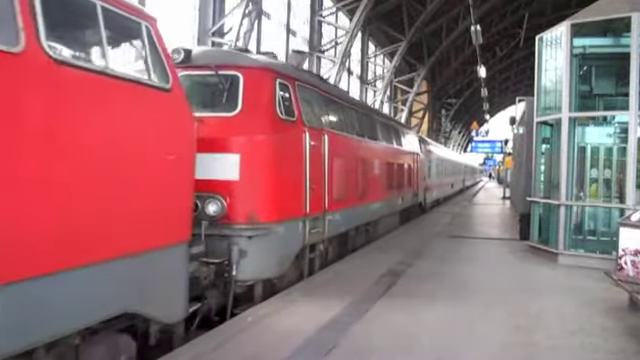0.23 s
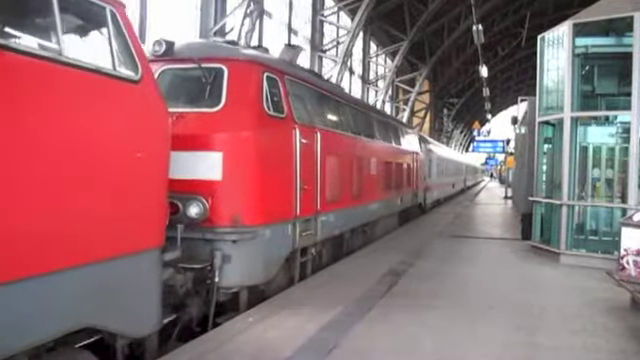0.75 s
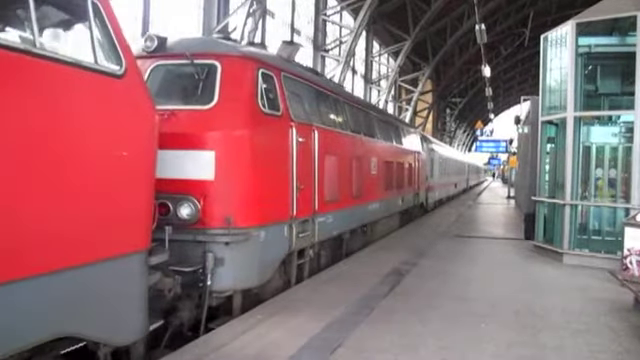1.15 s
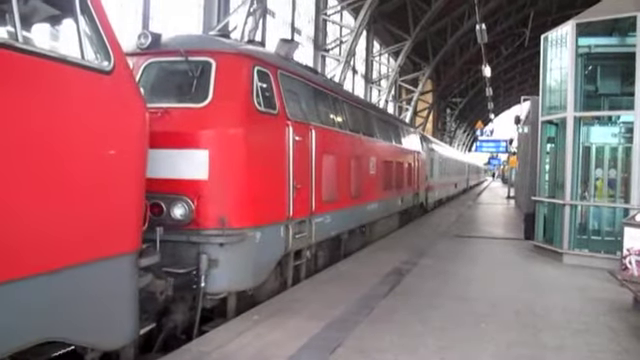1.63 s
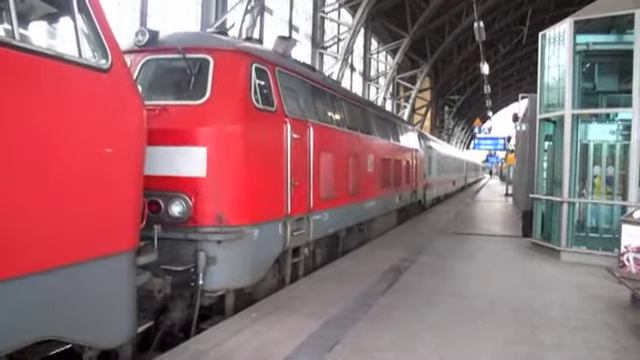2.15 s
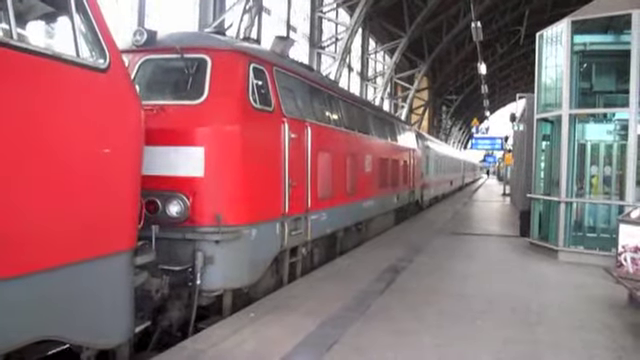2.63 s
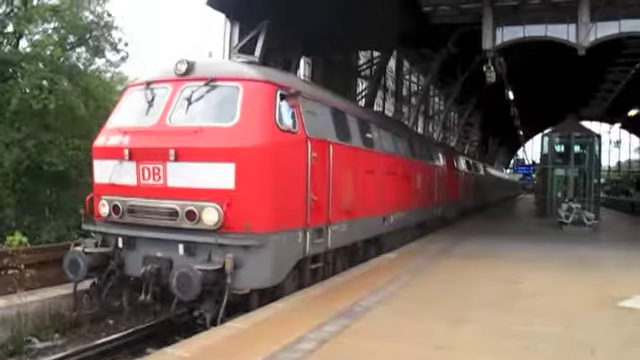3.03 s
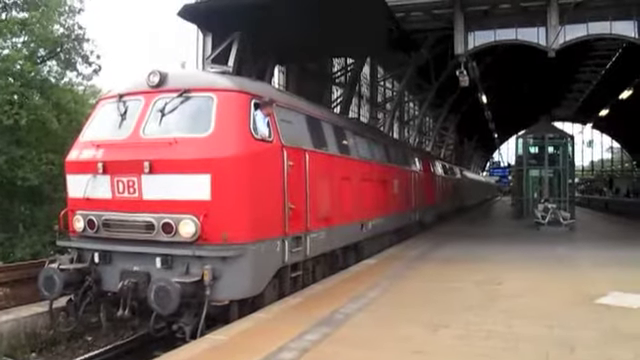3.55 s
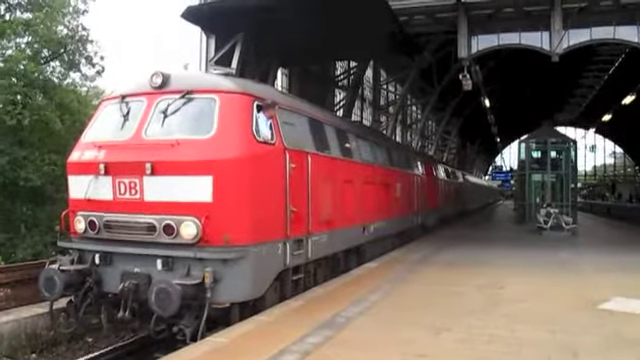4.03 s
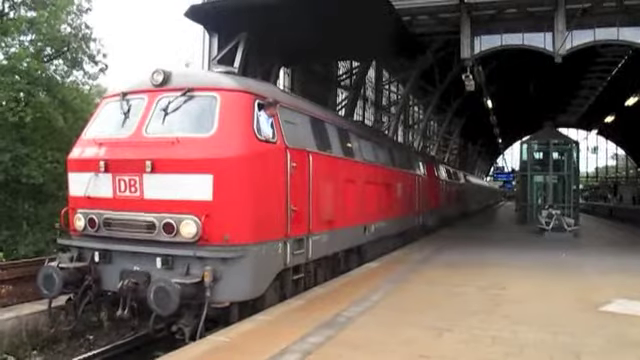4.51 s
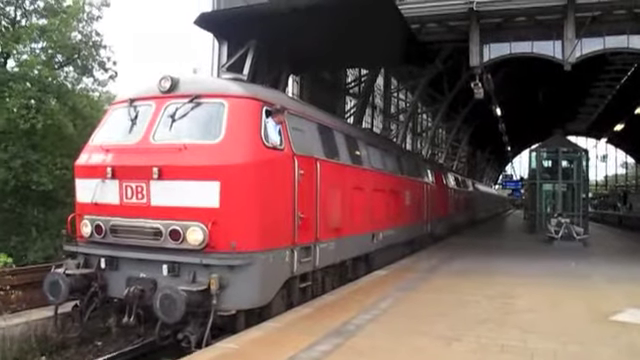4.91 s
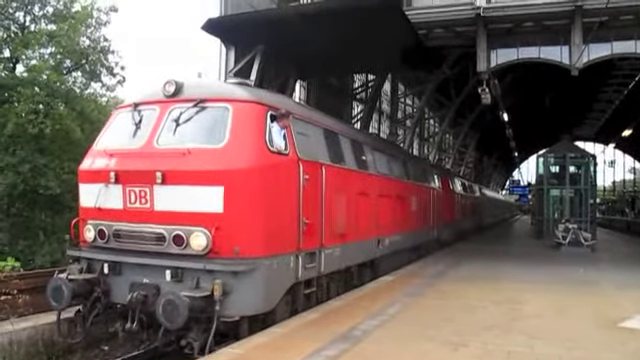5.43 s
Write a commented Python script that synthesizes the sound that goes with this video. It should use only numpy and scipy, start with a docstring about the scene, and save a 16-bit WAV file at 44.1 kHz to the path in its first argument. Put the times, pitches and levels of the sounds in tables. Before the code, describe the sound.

Under a station roof, a braking train gives a long, piercing wheel squeal, with shorter squeaks and the rub and hiss of brake blocks around it. The squeal dies away while diesel engines swell and begin to clatter. The sound cuts out for an instant, then resumes near the front locomotive, whose engines idle with a low hum, an even roar and sharp metallic ticking.

```python
"""Diesel locomotives braking and idling

In a station hall, stick-slip friction makes one wheel squeal on a high resonance; others join briefly
and brake blocks grind. Engine roar and clatter grow louder as the squeal fades. After a short silence
the front locomotive is heard from close by: two engines idle with a low periodic throb, a mid-range
roar and a clatter of valves and injectors, whose impacts excite the resonances of covers and pipes."""
import sys
import numpy as np
from scipy import signal
from scipy.fft import rfft, irfft, next_fast_len
from scipy.io import wavfile
from scipy.ndimage import uniform_filter1d

SR = 44100
rng = np.random.default_rng(int(sys.argv[2]) if len(sys.argv) > 2 else 0)


def waveform_to_disk(signal):
    """Save audio, clipped to [-1, 1], as 16-bit WAV at the path in sys.argv[1]."""
    frames = np.transpose(np.atleast_2d(signal))
    scaled = np.clip(frames, -1, 1) * 32767
    samples = np.round(scaled).astype(np.int16)
    wavfile.write(sys.argv[1], SR, samples)


N = 250047
T = np.arange(N) / SR
SILENCE_START_S, SILENCE_END_S = 2.753, 2.887

# The main wheel's ring holds, then dies as the train slows. Each row: time in seconds, level in dB.
RING_LEVEL = [(0, -21.5), (.45, -20), (.66, -19.5), (.8, -22.5), (1.47, -22), (1.62, -25), (1.75, -23.5),
              (2.05, -29), (2.2, -32.5), (2.3, -42), (2.75, -45.5)]
# The brake block lets go for an instant. Each row: time in seconds, depth of the dip in dB.
SLIPS = [(.17, 12), (.31, 11.5), (.37, 9), (.409, 9), (0.49, 15), (.79, 18), (.919, 11), (1.048, 14),
         (1.17, 2.5), (1.311, 12), (1.39, 24), (1.57, 7), (1.81, 14), (2.08, 17)]
# Combination tones. Each row: multiple of the ring, multiple of the lower mode, relative level in dB.
SIDEBANDS = [(0, 1, -2.5), (1, -1, -6.5), (1.001, 1, -4), (2.001, -1, -8.5), (2, 1, -6), (.5, 0, -11.5),
             (1.5, 0, -9.5)]
# The lower mode joins late and catches twice. Each row: time in seconds, sideband level in dB.
SIDEBAND_LEVEL = [(0, -46), (.65, -51), (1.05, -35), (1.2, -42), (1.35, -34), (1.67, -32), (1.8, -36.5)]
# Other wheels. Each row: start in seconds, length in seconds, pitch in Hz, glide in Hz/s, level in dB.
WHEEL_SQUEALS = [(0, .25, 2250, 160, -36), (0, 1.1, 10575, 0, -46), (.36, .1, 3220, -700, -40),
                 (.38, .08, 2990, 0, -41), (.47, .08, 1150, 600, -34), (.7, .16, 2480, -200, -36),
                 (.86, .19, 3240, -250, -43), (1.02, .13, 9370, 300, -41), (1.03, .19, 7730, -200, -40),
                 (1.14, .09, 5170, 400, -35), (1.24, .21, 6300, 0, -42), (1.15, .8, 4202, 0, -41)]
# Rubbing of the brake blocks. Each row: time in seconds, grinding level in dB, hiss level in dB.
BRAKE_LEVELS = [(0, -35, -32.5), (.22, -36, -39.5), (.35, -34.5, -34.5), (.62, -39, -40.5),
                (.75, -34.5, -32), (.92, -37.5, -35.5), (1.3, -37.5, -38), (1.6, -39, -38.5),
                (2.0, -38.5, -37), (2.25, -42, -35.5), (2.42, -37, -37), (2.75, -39.5, -36)]
# The clatter grows as the squeal fades, then wavers at idle. Each row: time in seconds, level in dB.
CLATTER_LEVEL = [(1.6, -58), (1.85, -37.5), (2.22, -28.5), (2.4, -33), (2.75, -34.5), (2.9, -32.5),
                 (3.4, -33.5), (3.55, -33), (3.95, -32), (4.45, -36.5), (4.95, -29), (5.12, -33),
                 (5.6, -31)]
# The loudest valve gear rattles. Each row: start in seconds, strength in dB.
LOUD_RATTLES = [(1.8322, -30), (1.9284, -31.5), (2.0184, -30), (2.1794, -33), (2.3944, -31.5),
                (2.6292, -33), (2.9277, -31), (3.012, -27.5), (3.1418, -29), (3.3159, -37), (3.5112, -31.5),
                (3.736, -31.5), (3.8956, -30.5), (4.0657, -33), (4.3386, -33.5), (4.899, -27), (4.991, -27),
                (5.187, -26.5), (5.2649, -27), (5.3368, -33), (5.3926, -31.5), (5.483, -30.5), (5.613, -29)]
# Resonances of covers and pipes. Each entry: frequency in Hz.
CASING_HZ = [6580, 7220, 7840, 7920, 8980]
# The near engine. Each row: time in seconds, firing rate in Hz, level in dB.
FIRING = [(2.89, 95.1, -38), (4.45, 86.2, -43.5), (5.6, 86.3, -44)]
# Engine orders. Each row: multiple of the firing rate, relative level in dB.
ENGINE_ORDERS = [(1, -1.5), (1.5, -27), (2, -7.5)]
# Resonances of the engine block. Each row: frequency in Hz, bandwidth in Hz, level in dB.
BLOCK_MODES = [(1050, 32, -36.5), (1198, 68, -37.5), (1322, 110, -39), (2140, 120, -42)]
# Engine roar under the roof. Each row: time in seconds, level in dB.
HALL_ROAR_LEVEL = [(0, -42.5), (.25, -42.5), (.5, -34), (.75, -42), (1.27, -35), (1.6, -35), (1.98, -25.5),
                   (2.2, -28), (2.4, -24), (2.75, -25)]
# Spectra of the five noises. Each row: frequency in Hz, relative spectral density in dB.
GRIND_SPECTRUM = [(800, -22), (1080, 2.5), (1500, -6.5), (2130, 4), (2600, -1), (3200, 2), (3700, -6),
                  (4300, -2), (4900, -16), (7000, -38.5)]
HISS_SPECTRUM = [(2500, -19.5), (4500, -12.5), (6200, -7.5), (9200, -6.5), (10400, -7.5), (11500, -25.5),
                 (13400, -30.5), (15600, -42.5)]
CLATTER_SPECTRUM = [(2000, -26), (3200, -3.5), (4500, -3), (6800, 0.5), (9400, -1), (10400, -7.5),
                    (11600, -22.5), (13700, -26.5), (15600, -35)]
IDLE_ROAR_SPECTRUM = [(18, -58), (30, -21), (54, -28), (86, -10.5), (122, -6), (194, -6), (371, -7),
                      (995, -2.5), (1060, 0), (1610, -9), (2210, -6.5), (4500, -23.5), (5850, -49),
                      (9900, -120)]
HALL_ROAR_SPECTRUM = [(18, -68.5), (30, -23), (240, -9.5), (412, -8.5), (510, -2), (764, -4.5),
                      (1080, -0.5), (1250, -4.5), (1900, -14), (2100, -6.5), (2300, -14), (3000, -22.5),
                      (3900, -45)]


def wheel_squeal(ring_hz=4269, lower_mode_hz=1084, slip_s=.014, overtones_end_s=1.916):
    """Stick-slip sustains a wheel mode; nonlinearity adds harmonics and sidebands with a lower mode."""
    hz = ring_hz + 2.65 * walk(3.68)
    dips_db = sum(db * np.exp(-((T - s) / slip_s) ** 2) for s, db in SLIPS)
    direct = tone(hz, 1.2, 4, 30)
    # Weaker arrivals of the same ring interfere with the direct one, most at first.
    reflected = np.interp(T, (.45, .6), (.4, .2)) * tone(hz, 2.2, 24, 60)
    ring = undb(curves(RING_LEVEL)[0] - dips_db) * (direct + reflected)
    octave = tone(2 * hz, 1.55, 6.37, 29.46) + .5 * tone(2 * hz, 7.4, 30.3, 40)
    third_harmonic = undb(-21.5) * tone(3 * hz, 3.5, 9, 25)
    overtones = undb(-36 + 2 * T) * (octave + third_harmonic)
    sideband_db = curves(SIDEBAND_LEVEL)[0]
    for of_ring, of_lower, db in SIDEBANDS:
        sideband_hz = of_ring * hz + of_lower * lower_mode_hz
        overtones += undb(sideband_db + db) * rubbed_mode(sideband_hz, width_hz=75)
    return ring + overtones * np.clip((overtones_end_s - T) / .083, 0, 1)


def other_wheels():
    """Friction excites a mode of each wheel for as long as it catches."""
    out = np.zeros(N)
    for start, length, hz, glide, db in WHEEL_SQUEALS:
        grip = np.clip(np.minimum(T - start, start + length - T) / .03 + .5, 0, 1)
        pitch_hz = hz + glide * np.clip(T - start, 0, length)
        out += undb(db) * grip * rubbed_mode(pitch_hz, width_hz=30)
    return out


def brake_blocks():
    """Sliding friction radiates broadband noise: a mid-range grinding and a high hiss."""
    grind_db, hiss_db = curves(BRAKE_LEVELS)
    grind = noise(GRIND_SPECTRUM, (2300, 3100), throb_db=1, flicker_db=1.5, rate_hz=16)
    hiss = noise(HISS_SPECTRUM, (5500, 7300), throb_db=1.5, flicker_db=1.5, rate_hz=16)
    return undb(grind_db) * grind + undb(hiss_db) * hiss


def idling_engines(far_hz=192.5):
    """Periodic firing gives the near engine's orders and the far one's hum; casing and block resound."""
    firing_hz, firing_db = curves(FIRING)
    orders = sum(undb(db) * tone(order * firing_hz, 1.8, 2.5, 18) for order, db in ENGINE_ORDERS)
    far_hum = undb(-42) * tone(far_hz, 2.5, 3, 10)
    roar_db = -26.5 + .6 * (T - SILENCE_END_S)
    roar = noise(IDLE_ROAR_SPECTRUM, (270, 3400), throb_db=.28, flicker_db=1, rate_hz=14)
    block = sum(undb(db) * block_mode(hz, width_hz) for hz, width_hz, db in BLOCK_MODES)
    return undb(firing_db) * orders + far_hum + undb(roar_db) * roar + block


def block_mode(hz, width_hz):
    """A resonance of the block under random forcing rings in a narrow band; its level flickers."""
    ring = resonate(rng.standard_normal(N), hz, width_hz)
    return ring / ring.std() * undb(2.6 * walk(9))


def valve_clatter(rise_s=.006, decay_s=.02, soft_from_s=1.8, soft_per_s=7):
    """Over a throbbing hiss, each impact is a noise burst that excites the casing modes in a new mix."""
    gain = undb(curves(CLATTER_LEVEL)[0])
    hiss = gain * noise(CLATTER_SPECTRUM, (5000, 10000), throb_db=1.5, flicker_db=1.3, rate_hz=70)
    drive = noise(CLATTER_SPECTRUM, (5000, 8200), throb_db=0, flicker_db=3.3, rate_hz=120)
    rings = np.array([resonate(drive, hz, width_hz=110) for hz in CASING_HZ])
    t = np.arange(SR // 10) / SR
    envelope = np.minimum(t / rise_s, 1) * np.exp(-np.maximum(t - rise_s, 0) / decay_s)
    # One softer rattle falls at random within each time slot.
    slots = np.arange(soft_from_s, N / SR - 1 / soft_per_s, 1 / soft_per_s)
    soft_starts = ((slots + rng.random(len(slots)) / soft_per_s) * SR).astype(int)
    soft_sizes = gain[soft_starts] * undb(-2 - 1.5 * rng.standard_normal(len(slots)))
    impacts = [(int(s * SR), undb(db)) for s, db in LOUD_RATTLES] + list(zip(soft_starts, soft_sizes))
    mode_mixes = undb(1.8 * rng.standard_normal((len(impacts), len(CASING_HZ))))
    rattles = np.zeros(N)
    for (i, size), mix in zip(impacts, mode_mixes):
        n = min(len(t), N - i)
        burst = .8 * drive[i:i + n] + 1.3 * mix @ rings[:, i:i + n]
        rattles[i:i + n] += size * envelope[:n] * burst
    sustained_rings = gain * undb(-6.5) * sum(ring * undb(1.4 * walk(25)) for ring in rings)
    return hiss + rattles + sustained_rings


def hall_roar():
    """The engines radiate broadband noise under the roof; it grows louder as the squeal fades."""
    roar = noise(HALL_ROAR_SPECTRUM, (200, 900), throb_db=.4, flicker_db=.9, rate_hz=12)
    return undb(curves(HALL_ROAR_LEVEL)[0]) * roar


def faint_squeaks(count=280, span_s=1.8, lo_hz=1900, hi_hz=10500, mean_length_s=.13):
    """Short, slightly gliding sines at scattered pitches superpose into a faint bed of squeaks."""
    out = np.zeros(N)
    for when, pitch, size, length, glide in rng.random((count, 5)):
        n = int(SR * mean_length_s * (.5 + length))
        i = int(when * span_s * SR)
        progress = np.arange(min(n, N - i)) / n
        hz = (lo_hz + (hi_hz - lo_hz) * pitch) * (1 + .0084 * (glide - .5) * progress)
        envelope = undb(-47 + 6.5 * size) * np.sin(np.pi * progress)
        out[i:i + len(progress)] += envelope * np.sin(2 * np.pi * np.cumsum(hz) / SR)
    return out


def rubbed_mode(hz, width_hz):
    """Rubbing modulates a mode at random, spreading part of its tone into a narrow band of noise."""
    return tone(hz, 2, .2 * width_hz, 20) * (1.1 + .65 * walk(width_hz))


def tone(hz, fade_db, wobble_hz, rate_hz):
    """A sine of rms near 1 wavers in level and pitch, as interfering echoes in a hall make it do."""
    cycles = np.cumsum(hz + wobble_hz * walk(rate_hz)) / SR + rng.random()
    return np.sqrt(2) * undb(fade_db * walk(rate_hz)) * np.sin(2 * np.pi * cycles)


def noise(colour, unit_band_hz, throb_db, flicker_db, rate_hz):
    """Shaped noise, of rms 1 within unit_band_hz; half-octave bands then throb as one and flicker alone."""
    size = next_fast_len(N, True)
    hz = np.maximum(np.arange(size // 2 + 1) * SR / size, 1)
    knots_hz, knots_db = np.transpose(colour)
    shape_db = np.interp(np.log(hz), np.log(knots_hz), knots_db, -90, -90)
    spectrum = rfft(rng.standard_normal(size)) * undb(shape_db)
    in_band = (hz > unit_band_hz[0]) & (hz < unit_band_hz[1])
    spectrum /= np.sqrt(2 * np.sum(np.abs(spectrum[in_band]) ** 2)) / size
    common_db = throb_db * walk(rate_hz)
    half_octaves = 2 * np.log2(hz)
    out = np.zeros(N)
    for centre in range(int(2 * np.log2(knots_hz[0])), int(2 * np.log2(knots_hz[-1])) + 2):
        band = np.clip(1 - np.abs(half_octaves - centre), 0, 1)
        out += irfft(spectrum * band, size)[:N] * undb(common_db + flicker_db * walk(rate_hz))
    return out


def resonate(drive, hz, width_hz):
    """A damped oscillator responds most strongly to forcing near its natural frequency."""
    return signal.lfilter(*signal.iirpeak(hz, hz / width_hz, fs=SR), drive)


def walk(rate_hz):
    """Random steps, smoothed twice, give a slow fluctuation with a spread near 1."""
    hold = int(SR / rate_hz)
    steps = np.repeat(rng.standard_normal(N // hold + 1), hold)
    return 1.335 * uniform_filter1d(uniform_filter1d(steps, hold), hold)[:N]


def curves(table):
    """Linear interpolation turns each column after the time into one value per sample."""
    seconds, *columns = np.transpose(table)
    return [np.interp(T, seconds, column) for column in columns]


def undb(db):
    """Amplitude grows tenfold for every 20 dB."""
    return 10 ** (np.asarray(db) / 20)


def scene():
    """Sources superpose: the arrival before the silence, the idling after it, the clatter in both."""
    before = np.clip((SILENCE_START_S - T) / .001, 0, 1)
    after = np.clip((T - SILENCE_END_S) / .006, 0, 1)
    arrival = hall_roar() + brake_blocks() + faint_squeaks() + wheel_squeal() + other_wheels()
    return (before * arrival + after * idling_engines() + (before + after) * valve_clatter())[None]


def record(dry):
    """A band-stop filter cuts a narrow gap in the treble, and a steep low-pass removes the top."""
    gap = signal.butter(2, (11500, 12150), "bandstop", fs=SR, output="sos")
    low_pass = signal.ellip(8, .2, 70, 15700, fs=SR, output="sos")
    return signal.sosfilt(low_pass, signal.sosfilt(gap, dry))


dry = scene()
out = record(dry)
waveform_to_disk(out)
```